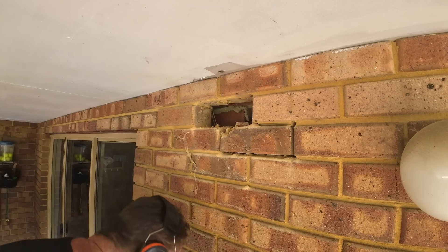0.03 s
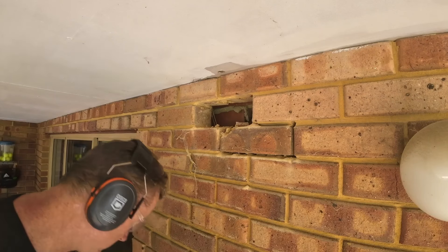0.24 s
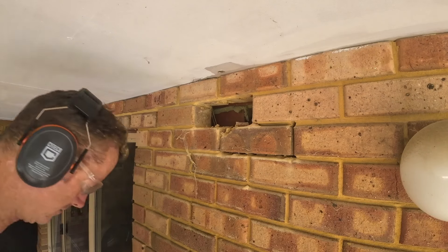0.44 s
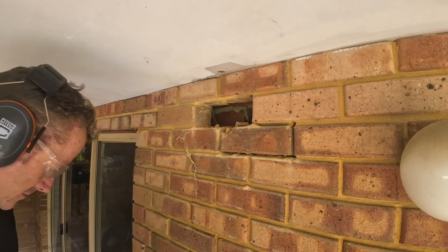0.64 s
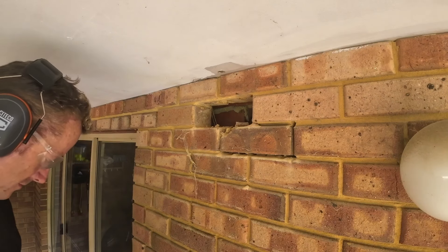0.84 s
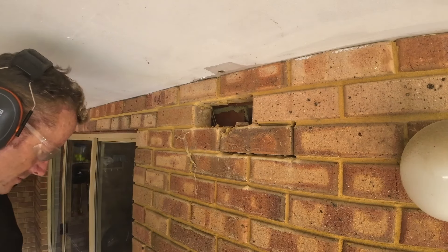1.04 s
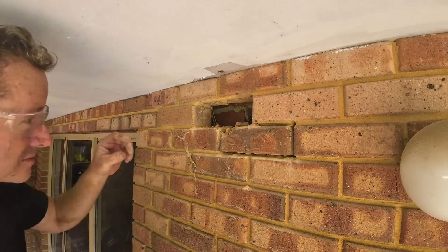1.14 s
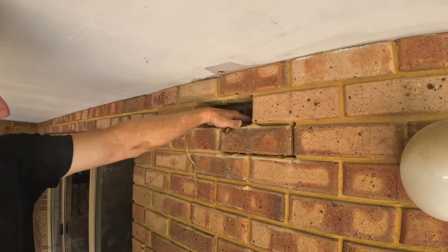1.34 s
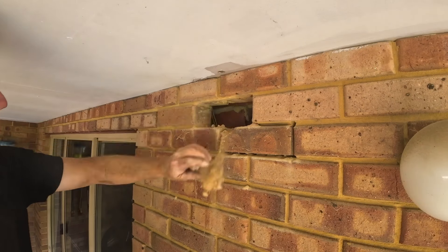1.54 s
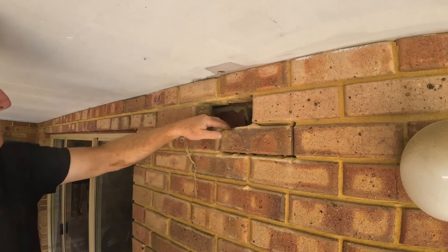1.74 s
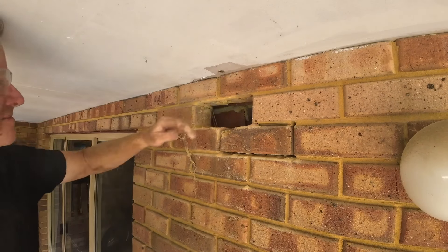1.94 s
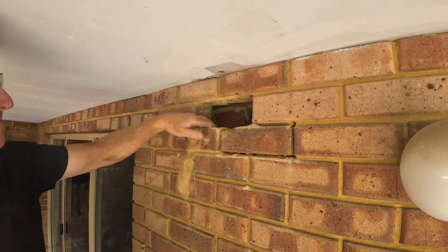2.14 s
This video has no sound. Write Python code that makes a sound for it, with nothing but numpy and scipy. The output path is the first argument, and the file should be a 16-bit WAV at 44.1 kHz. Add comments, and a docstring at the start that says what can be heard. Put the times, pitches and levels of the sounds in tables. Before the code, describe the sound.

A loud, booming thud on the floor, followed by gritty scrapes and clicks of loose brick.

```python
"""A heavy object is set down on the floor of a small brick room: it thuds, judders and leaves a
low boom in floor and wall, then scuffs and clacks. A hand then feels into a nearby gap in the wall:
fingers bump and rub on gritty mortar, sand grains break, and a loose piece of brick scrapes and
knocks. Clothes rustle over faint hiss and a low microphone-like rumble."""
import sys
import numpy as np
from scipy import signal
from scipy.fft import rfft, irfft
from scipy.io import wavfile

SR = 44100
rng = np.random.default_rng(int(sys.argv[2]) if len(sys.argv) > 2 else 0)


def materialize(psi):
    """Save the field psi as 16-bit PCM at rate SR to the path in sys.argv[1].

    A 1-D psi becomes a single channel; in a 2-D psi each row is a channel.
    """
    bounded = np.clip(np.atleast_2d(psi).T, -1, 1)
    quanta = np.round(bounded * 32767).astype(np.int16)
    wavfile.write(sys.argv[1], SR, quanta)


N = 97020
T = np.arange(N) / SR


# blows on the floor: start_s, level_db
THUD_BLOWS = [(0.23488, 2), (0.2492, -12.5), (0.2625, -15), (0.311, -17), (0.322, -20), (0.39, -22)]
# dead ring of the object: pitch_hz, gain_db, swell_s
THUD_MODES = [(274, -10.5, .0009), (823, -1.5, 0.00082), (1021, -4, 0.00097), (2128, -15, 0.0011),
              (4770, -32.5, .0005), (9770, -34.5, 0.0009)]

def thud():
    """The heavy object lands: one hard blow, then lighter ones."""
    return strike(THUD_BLOWS, THUD_MODES)


# object and room bands: freq_hz, density_db, t60_s
JUDDER_BANDS = [(39.5, -26.5, 1), (84, 0, 1.4), (155, 1, 0.61), (194, -6, 0.52), (370, -2, 0.38),
                (527.6, -10.5, 0.51), (752.6, -6.5, 0.35), (1140, -4, 0.41), (1500, -14.5, 0.4),
                (2160, -13.5, 0.41), (4100, -25, 0.36), (6100, -29, 0.41), (8800, -37.5, 0.4),
                (11390, -34.5, 0.44), (13400, -52.5, 0.25)]

def judder(start_s=.2365, level_db=-20.5, hold_s=.14, hold_fall_db_per_s=63.5):
    """Dense rattle and room tail after the thud, held up briefly as by a limiter, then dying away."""
    t = np.maximum(T - start_s, 0)
    held_s, free_s = np.minimum(t, hold_s), np.maximum(t - hold_s, 0)
    spectrum, out = rfft(noise(JUDDER_BANDS)), 0
    log_centres = np.log([row[0] for row in JUDDER_BANDS])
    for share, (_, _, t60_s) in zip(np.eye(len(JUDDER_BANDS)), JUDDER_BANDS):
        crossover = np.interp(np.log(freqs(N) + 1), log_centres, share)
        out += irfft(spectrum * crossover, N) * decay(free_s, t60_s)
    return out * (T > start_s) * undb(level_db - hold_fall_db_per_s * held_s)


# floor and wall modes: start_s, pitch_hz, level_db, rise_s, t60_s, right_phase_rad, left_over_right_db
BOOM_MODES = [(0.39, 96, -33, 0.02, 0.7, 0.6, 0), (0.33, 76, -31, 0.033, 2.0, 1.6, -6),
              (1.79, 100, -46, 0.05, 1.7, 0.45, 0)]

def booms():
    """Low modes of floor and wall reach the two ears at different phase and level."""
    return sum(tone(*mode) * undb([[pan_db / 2], [-pan_db / 2]]) for *mode, pan_db in BOOM_MODES)


# object rings and squeaks: start_s, pitch_hz, level_db, rise_s, t60_s
OBJECT_RINGS = [(0.312, 160, -20, .012, .16), (0.331, 95, -15, .006, .06), (0.24, 535, -40, .01, 1.3),
                (0.684, 2243, -40.5, .04, .16), (0.878, 1080, -47.5, 0.016, 0.16)]

def rings():
    """The object rings as it settles, squeaks as it shifts and rings again after the clack."""
    return sum(tone(*mode) for mode in OBJECT_RINGS)


# scuff resonances: centre_hz, width_hz, gain_db
SCUFF_MODES = [(1004, 96, 1), (1230, 820, -4), (2460, 360, -12.5), (5450, 200, -19)]

def scuff(peak_s=.714, level_db=-50.5, top_hz=12500):
    """The object rubs on the floor: friction noise through squeaky resonances."""
    f = np.geomspace(60, SR / 2, 900)
    response = sum(undb(db) / (1 + 1j * (f / hz - hz / f) * hz / width) for hz, width, db in SCUFF_MODES)
    response /= 1 + (f / top_hz) ** 10
    squeak = noise(np.column_stack([f, 20 * np.log10(np.abs(response))]))
    return undb(level_db) * squeak * swell(T - peak_s, rise_s=.028, fall_s=.048)


# clack spectrum: freq_hz, density_db
CLACK_SPECTRUM = [(250, -5), (640, -7.5), (800, 5.5), (1150, 4.5), (1550, -3), (2700, -1), (4200, -8),
                  (5600, -3), (8000, -14.5), (11000, -12), (14000, -31)]

def clack(peak_s=.845, level_db=-44):
    """The object clacks on the floor, blurred by the room into a noise burst."""
    return undb(level_db) * noise(CLACK_SPECTRUM) * swell(T - peak_s, rise_s=.0031, fall_s=.037)


# brick contacts: start_s, level_db
BRICK_KNOCKS = [(1.7353, -1.5), (1.73638, 1), (1.7405, -13), (1.7612, -23), (1.7902, -30), (1.8478, -29)]
# brick ring: pitch_hz, gain_db, swell_s
BRICK_MODES = [(283, -27.5, 0.0015), (930, -15, 0.00044), (1950, -24, 0.00085), (2820, -14.5, 0.00047),
               (3630, -16.5, 0.00053), (5500, -30, 0.00059), (7540, -32, .0004), (11200, -34, 0.00053)]

def brick_knocks():
    """The loose brick makes a quick double contact, then lighter knocks."""
    return strike(BRICK_KNOCKS, BRICK_MODES)


# taps on the wall: start_s, level_db, pitch_hz, swell_s
WALL_TAPS = [(1.4275, -48.5, 5980, .0005), (1.498, -37.5, 348, 0.0039), (1.509, -39, 5060, 0.00045),
             (1.514, -47, 168, 0.0096), (1.5228, -37, 861, 0.0019), (1.529, -47, 68, 0.017),
             (1.5494, -39.5, 3420, 0.0015), (1.7119, -24.5, 1940, 0.00042), (1.7124, -28.5, 5600, 0.0012),
             (1.736, -39.5, 124, 0.01), (1.769, -44.5, 272, 0.011), (2.008, -47, 403, 0.0035)]

def taps():
    """Fingers and chips touch the wall, each a brief pulse of one pitch."""
    out = np.zeros(N)
    for start_s, level_db, pitch_hz, swell_s in WALL_TAPS:
        add(out, start_s, undb(level_db) * damped_mode(start_s, pitch_hz, swell_s))
    return out


# scrapes in the gap: peak_s, rise_s, fall_s, level_db, tilt_db_per_octave, rub_over_grit_db
GAP_SCRAPES = [(1.364, 0.004, 0.011, -63, 0, 2.5), (1.4383, 0.001, .0016, -47.5, -7, -7),
               (1.446, 0.00072, 0.0014, -47.5, 2, -1), (1.452, 0.02, 0.033, -56.5, -8, 6.5),
               (1.470, .0006, 0.003, -50, 2, 1), (1.499, 0.0061, 0.0072, -48, -2, 5),
               (1.511, 0.0005, 0.0015, -44, 0.5, -8), (1.538, 0.019, 0.01, -50.5, -5, 5.5),
               (1.550, 0.0041, 0.005, -43, 0, -8), (1.712, 0.0016, 0.003, -26.5, 1.5, -5),
               (1.746, 0.0018, 0.0047, -34.5, 3, 2), (1.762, 0.0085, 0.0067, -34.5, -10.5, -1.5),
               (1.791, 0.0024, 0.0032, -48, 6, 11.5), (1.837, 0.0064, 0.0084, -44, 2, 0),
               (1.848, 0.0008, 0.006, -42, -0.5, -6.5), (2.011, 0.0024, 0.0056, -29, 2, -12),
               (2.016, 0.00075, 0.012, -37.5, -1.5, -5.5), (2.067, 0.0045, 0.035, -52.5, 3, -3.5),
               (2.128, 0.0095, 0.014, -48, -3, -3), (2.152, 0.0025, 0.037, -53, -0.5, -0.5)]
# sand grain spectrum: freq_hz, density_db
GRIT_SPECTRUM = [(300, -23), (1200, -11.5), (2600, 1), (4300, -1), (5600, 2), (8500, -7.5), (11000, -5),
                 (13500, -19), (15500, -26.5)]
# dull rub spectrum: freq_hz, density_db
RUB_SPECTRUM = [(60, -4.5), (150, -1.5), (330, -3), (550, -8.5), (900, -8.5), (1500, -13.5), (4000, -36)]

def scrapes(grains_per_s=4000, scatter_db=4.5):
    """Each scrape is a shower of breaking sand grains over a dull rub."""
    out, n = np.zeros((2, N)), 8192
    lead_s = T[n // 3]
    for peak_s, rise_s, fall_s, level_db, tilt, rub_db in GAP_SCRAPES:
        grains = (rng.random((2, n)) < grains_per_s / SR) * rng.choice([-1, 1], (2, n))
        sizes = undb(scatter_db * np.clip(rng.standard_normal((2, n)), -2, 2))
        grit = stereo(grains * sizes, GRIT_SPECTRUM, tilt, side_db=-3.5)
        rub = undb(rub_db) * stereo(rng.standard_normal((2, n)), RUB_SPECTRUM)
        envelope = undb(level_db) * swell(T[:n] - lead_s, rise_s, fall_s)
        add(out, peak_s - lead_s, envelope * (grit + rub))
    return out


# fingers on loose mortar: start_s, end_s
CRUMB_SPANS = [(1.32, 1.57), (2.03, 2.2)]

def crumbs(crumbs_per_s=70, level_db=-63):
    """Lone crumbs of mortar crack under the moving fingers."""
    touching = sum((T > start_s) & (T < end_s) for start_s, end_s in CRUMB_SPANS)
    clicks = (rng.random(N) < crumbs_per_s / SR) * rng.standard_normal((2, N))
    return undb(level_db) * touching * stereo(clicks, GRIT_SPECTRUM)


# rustle envelope: time_s, level_db
RUSTLE_LEVELS = [(0, -59.5), (.19, -58), (.24, -86), (.55, -58.5), (.8, -63), (.95, -77), (1.3, -84),
                 (1.42, -59.5), (1.95, -70.5), (2.05, -68.5), (2.2, -62.5)]
# cloth spectrum: freq_hz, density_db
CLOTH_SPECTRUM = [(220, -5.5), (310, 11), (500, -2), (1400, -2.5), (4300, -9.5), (5600, -2), (7500, -15.5),
                  (11000, -9.5), (13500, -27)]

def clothes():
    """Cloth rustles in slow swells of noise."""
    return noise(CLOTH_SPECTRUM) * undb(np.interp(T, *np.array(RUSTLE_LEVELS).T))


def room(x, delay_s=.0026):
    """Direct sound plus quick reflections from wall and ceiling and a short tail."""
    early, tail = (.1, -12.5), (.3, -17.5)  # t60_s, level_db
    spectrum = [(200, 4.5), (3000, -3.5), (14000, -1)]  # freq_hz, density_db
    response = 0
    for t60_s, level_db in early, tail:
        fade = decay(T, t60_s) * (T > delay_s)
        response += undb(level_db) * fade / np.linalg.norm(fade) * noise(spectrum)
    return x + signal.fftconvolve(x, response, axes=1)[:, :N]


# faint hiss: freq_hz, density_db
HISS_SPECTRUM = [(60, -4.5), (130, -3.5), (220, -11), (340, -8.5), (600, -16), (1200, -19), (11000, -38.5),
                 (14000, -50.5)]
# low rumble: freq_hz, density_db
RUMBLE_SPECTRUM = [(15, -10), (35, 2), (60, -5.5), (110, -9.5), (400, -56.5)]

def background(hiss_db=-61.5, rumble_db=-55.5, surge_db=15, surge_peak_s=.48):
    """Faint steady hiss and a low microphone-like rumble that swells just after the thud."""
    surge = undb(surge_db) * swell(T - surge_peak_s, rise_s=.07, fall_s=.16)
    rumble = noise(RUMBLE_SPECTRUM) * (1 + surge)
    return undb(hiss_db) * noise(HISS_SPECTRUM) + undb(rumble_db) * rumble


# stereo width: freq_hz, side_over_mid_db
STEREO_WIDTH = [(30, -5.5), (80, -4.5), (180, -15), (350, -15.5), (800, -18.5), (1500, -18.5), (2800, -11),
                (5500, -4.5), (11000, 0.5)]

def stereo(pair, spectrum, tilt_db_per_octave=0, side_db=0, tilt_from_hz=800):
    """Colour two unrelated signals as mid and side; return left and right at rms 1."""
    n = pair.shape[1]
    f = freqs(n)
    tilt_db = tilt_db_per_octave * np.log2(np.maximum(f, tilt_from_hz))
    mid, side = rfft(pair) * undb(db_at(spectrum, f) + tilt_db)
    side *= undb(db_at(STEREO_WIDTH, f) + side_db)
    return unit(irfft(np.array([mid + side, mid - side]), n))


def noise(spectrum):
    """Coloured stereo noise at rms 1."""
    return stereo(rng.standard_normal((2, N)), spectrum)


def strike(blows, modes):
    """Every blow rings the same damped modes."""
    out = np.zeros(N)
    for start_s, level_db in blows:
        ring = sum(undb(db) * damped_mode(start_s, hz, swell_s) for hz, db, swell_s in modes)
        add(out, np.floor(start_s * SR) / SR, undb(level_db) * ring)
    return out


def damped_mode(start_s, pitch_hz, swell_s):
    """A heavily damped mode that peaks after swell_s; start_s sets only the sub-sample offset."""
    t = np.maximum(T[:SR // 5] - start_s % (1 / SR), 0)
    return -t / swell_s * np.exp(1 - t / swell_s) * np.sin(2 * np.pi * pitch_hz * t)


def tone(start_s, pitch_hz, level_db, rise_s, t60_s, right_phase_rad=0, waver=.33, waver_hz=20):
    """A lone mode builds up and rings on, wavering in level and phase."""
    t = np.maximum(T - start_s, 0)
    lowpass = np.exp(-(freqs(N) / waver_hz) ** 2)
    level_drift, phase_drift = waver * unit(irfft(rfft(rng.standard_normal((2, N))) * lowpass, N))
    envelope = undb(level_db) * (1 - np.exp(-t / rise_s)) * decay(t, t60_s) * (1 + level_drift)
    return envelope * np.sin(2 * np.pi * pitch_hz * t + phase_drift + [[0], [right_phase_rad]])


def swell(t, rise_s, fall_s):
    """Exponential rise to time zero, exponential fall after it."""
    return np.exp(np.minimum(t / rise_s, -t / fall_s))


def decay(t, t60_s):
    """Fall of 60 dB per t60_s."""
    return np.exp(-np.log(1000) * t / t60_s)


def add(out, start_s, x):
    """Mix x in from start_s."""
    i = int(round(start_s * SR))
    n = max(0, min(x.shape[-1], N - i))
    out[..., i:i + n] += x[..., :n]


def db_at(spectrum, hz):
    """Interpolate levels on a log-frequency axis."""
    points = np.array(spectrum, float)
    return np.interp(np.log(np.maximum(hz, 1)), np.log(points[:, 0]), points[:, 1])


def freqs(n):
    """Bin frequencies of an n-sample spectrum."""
    return np.arange(n // 2 + 1) * SR / n


def undb(db):
    """Decibels to gain."""
    return 10 ** (np.asarray(db) / 20)


def unit(x):
    """Scale to rms 1."""
    return x / np.sqrt(np.mean(x ** 2))


def scene():
    """The object at the floor, then the hand in the wall, over clothes, hiss and rumble."""
    at_wall = brick_knocks() + taps() + scrapes() + crumbs()
    at_floor = thud() + judder() + booms() + rings() + scuff() + clack()
    return at_floor + room(at_wall) + clothes() + background()


def record(dry, low_cut_hz=16, clip_level=.99, top_hz=16300):
    """The deepest bass is thinned, the thud clips and the top is cut."""
    thinned = signal.sosfilt(signal.butter(1, low_cut_hz, "high", fs=SR, output="sos"), dry)
    clipped = np.clip(thinned, -clip_level, clip_level)
    return signal.sosfilt(signal.ellip(8, .1, 70, top_hz, fs=SR, output="sos"), clipped)


dry = scene()
out = record(dry)
materialize(out)
```